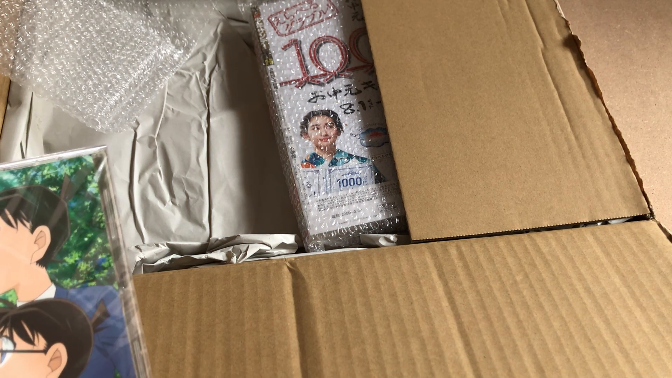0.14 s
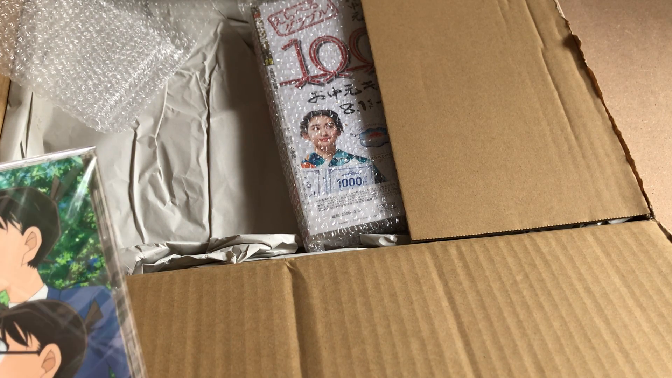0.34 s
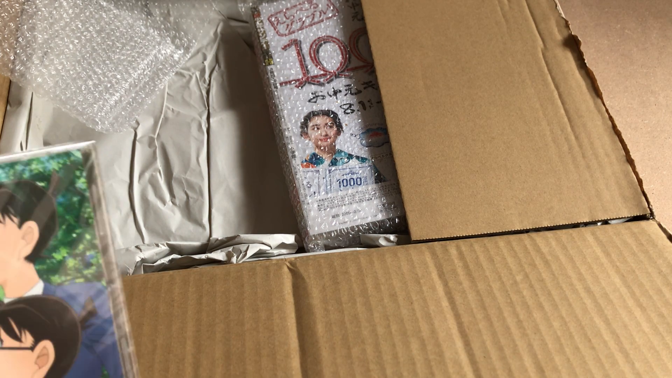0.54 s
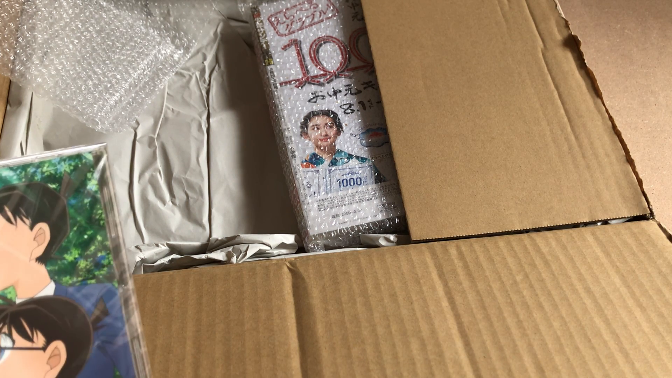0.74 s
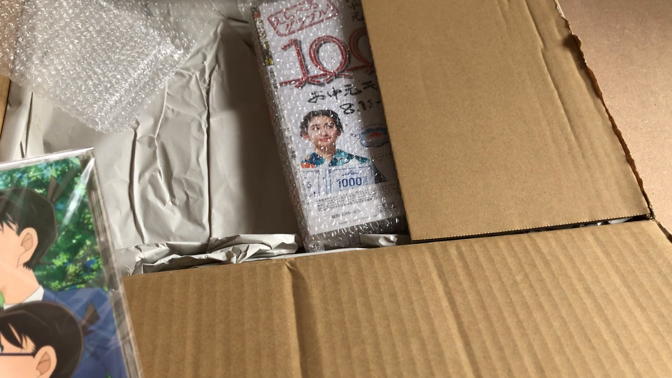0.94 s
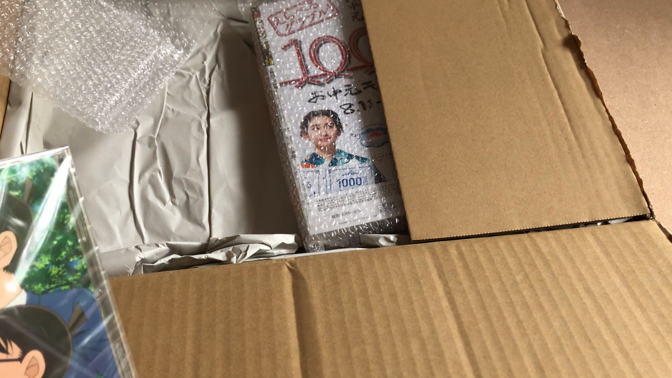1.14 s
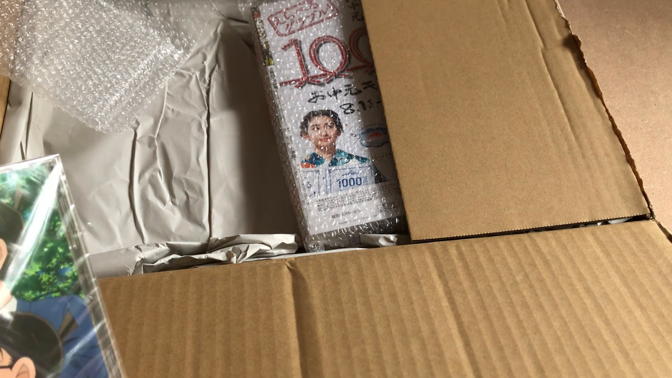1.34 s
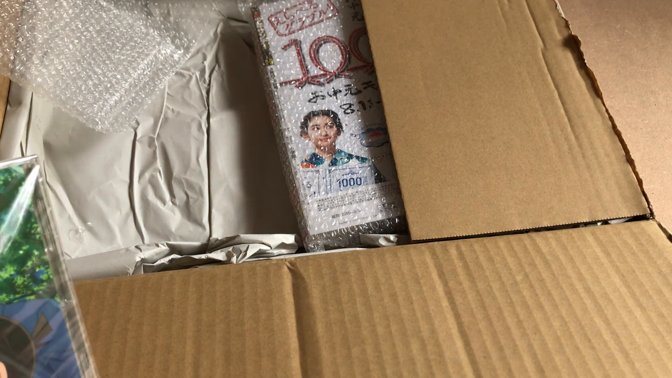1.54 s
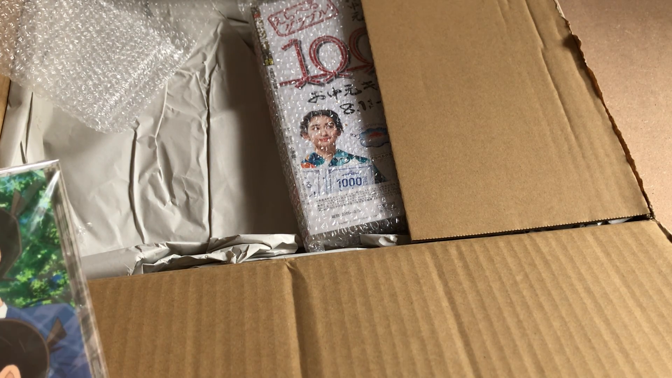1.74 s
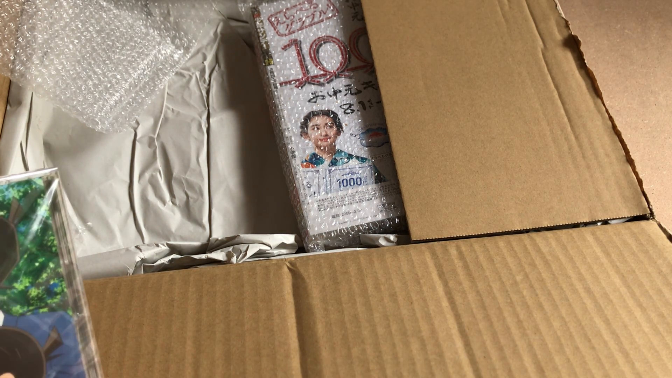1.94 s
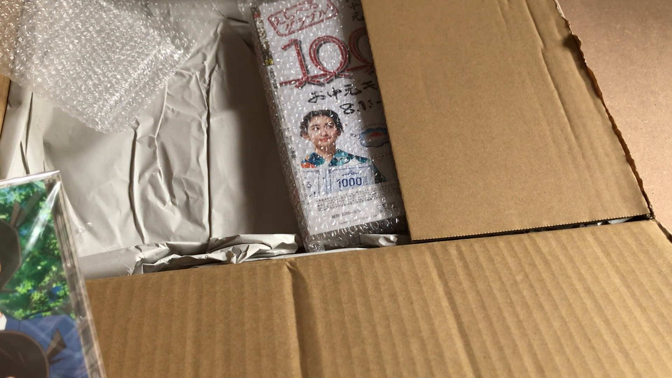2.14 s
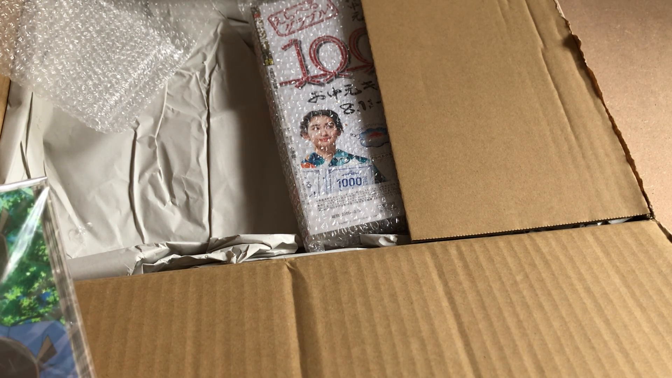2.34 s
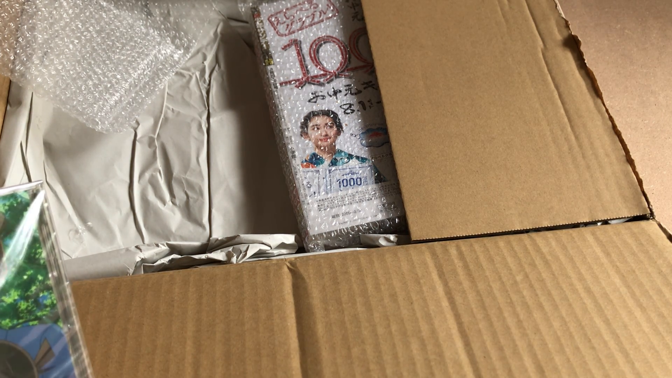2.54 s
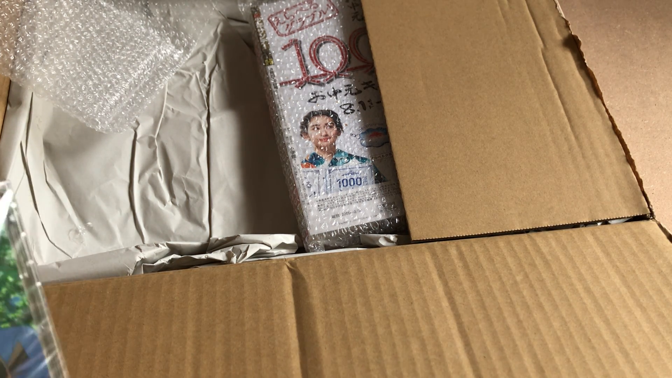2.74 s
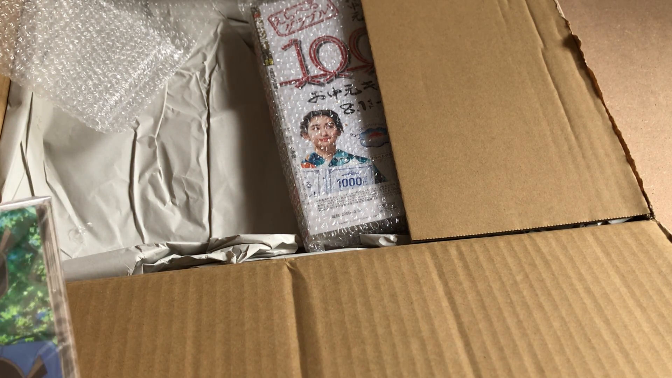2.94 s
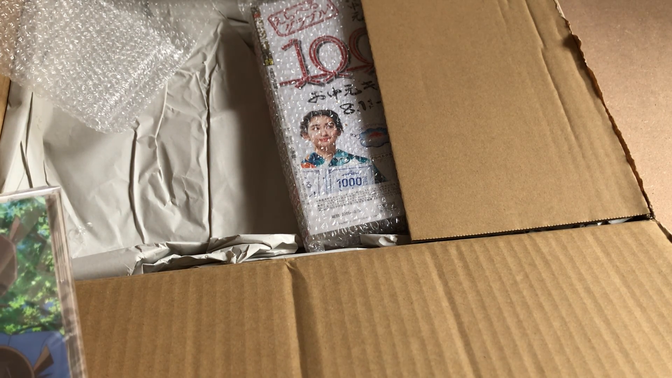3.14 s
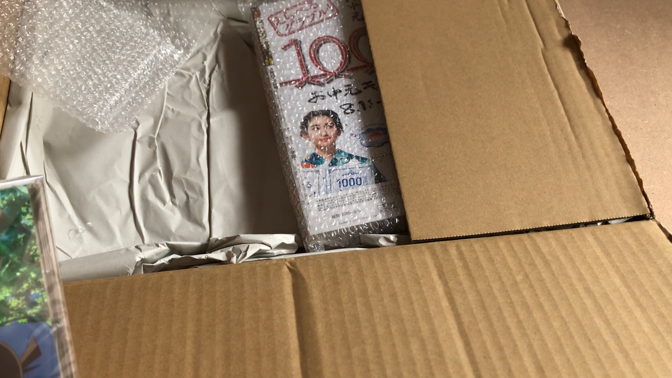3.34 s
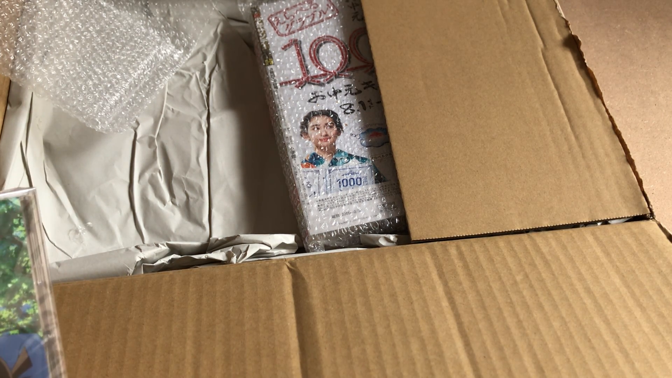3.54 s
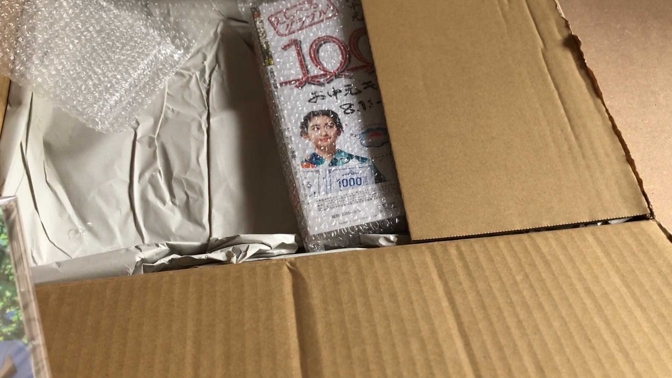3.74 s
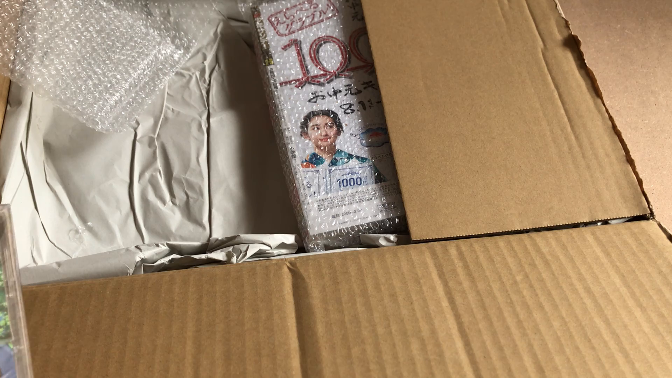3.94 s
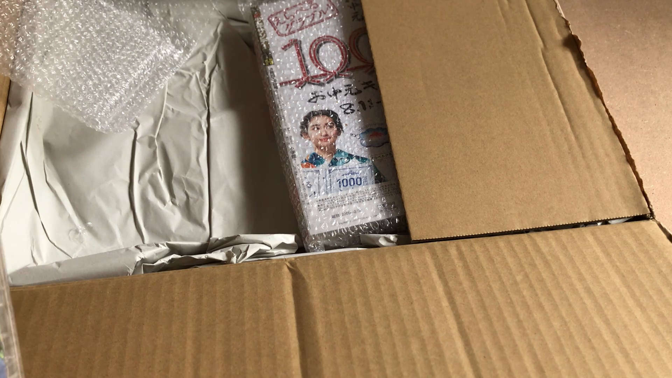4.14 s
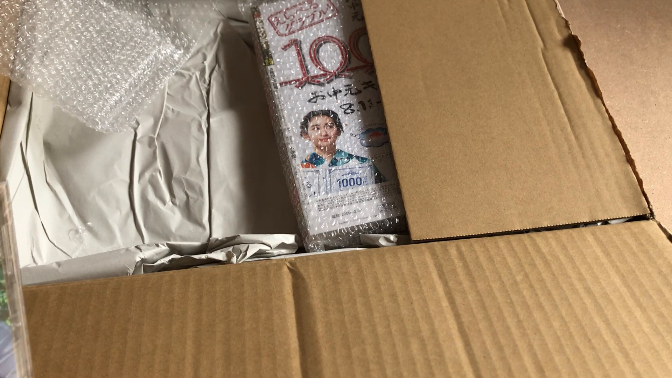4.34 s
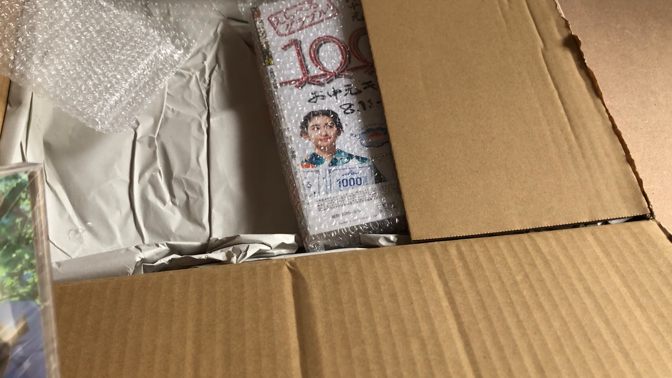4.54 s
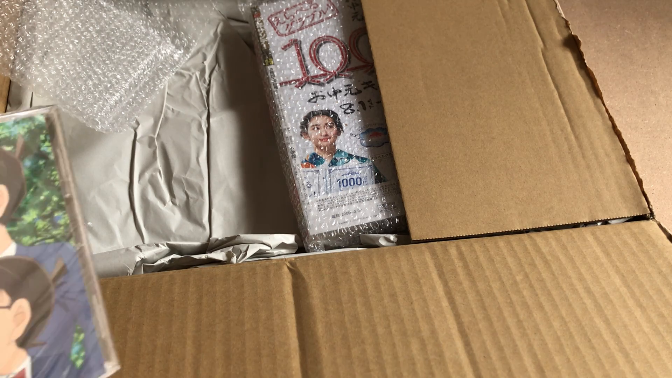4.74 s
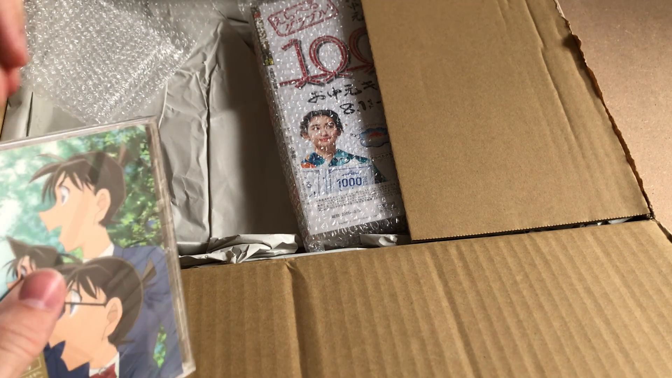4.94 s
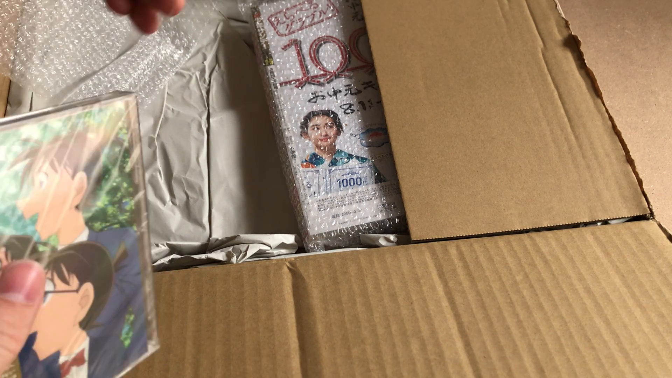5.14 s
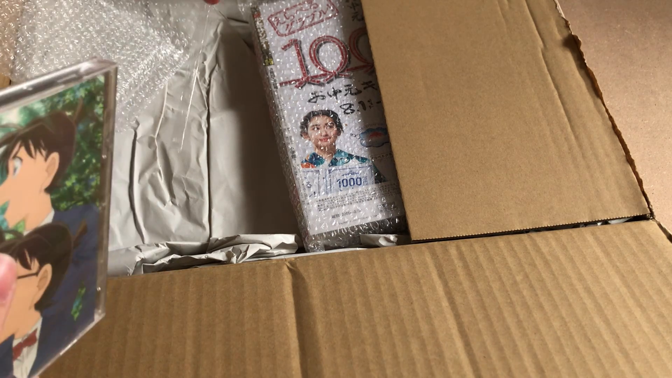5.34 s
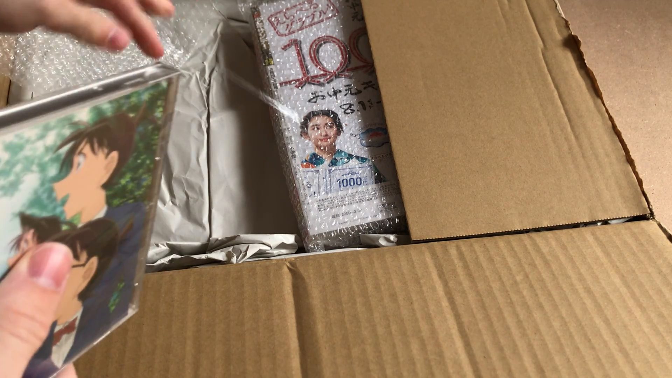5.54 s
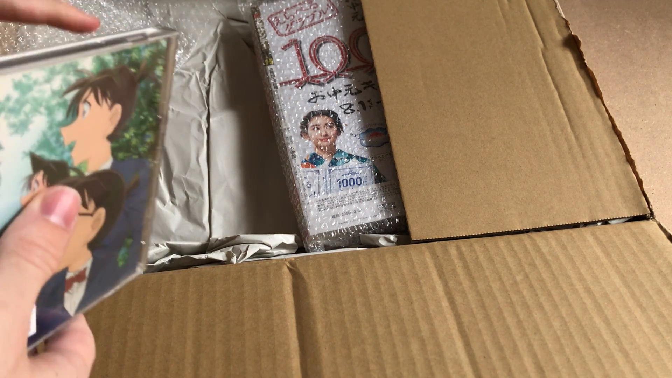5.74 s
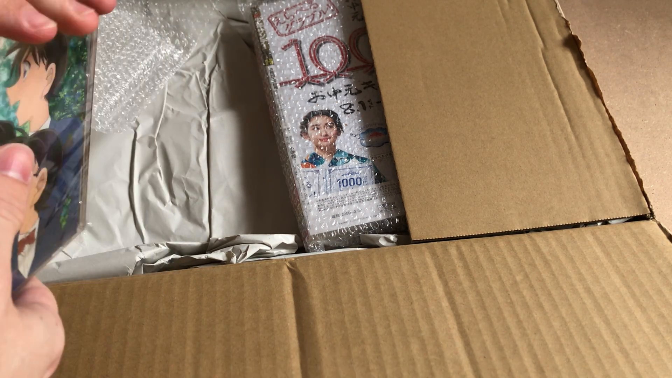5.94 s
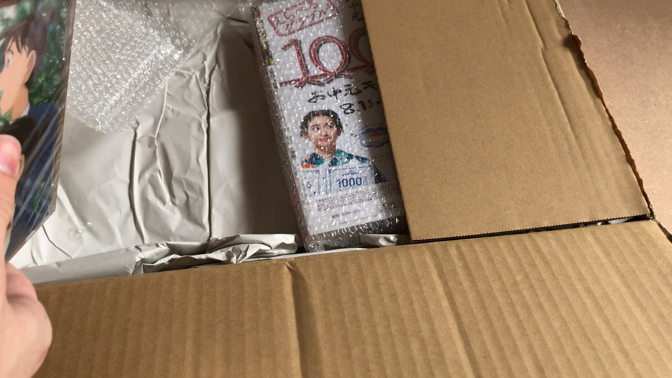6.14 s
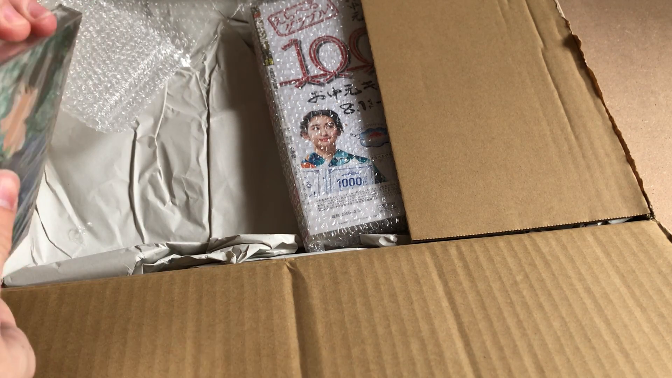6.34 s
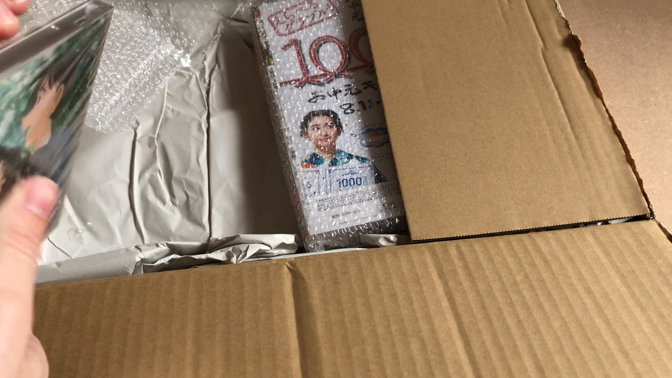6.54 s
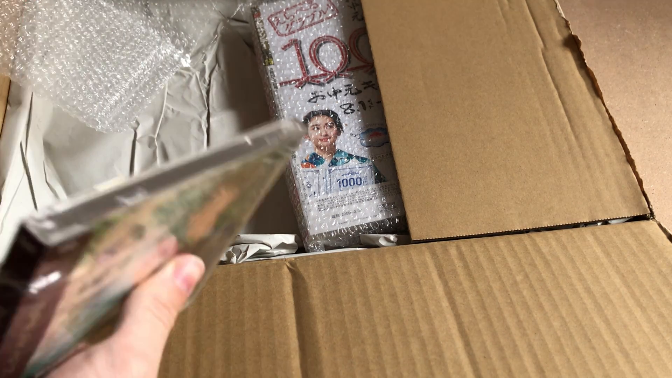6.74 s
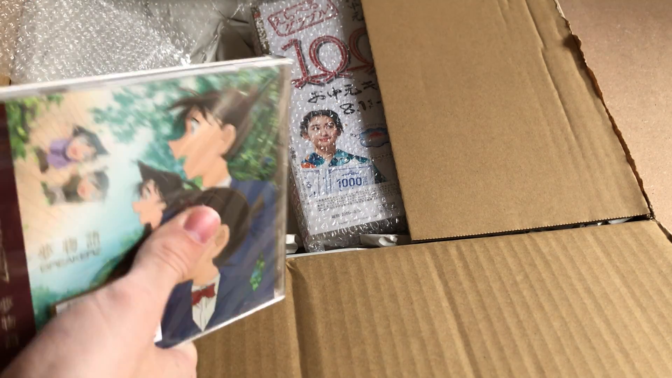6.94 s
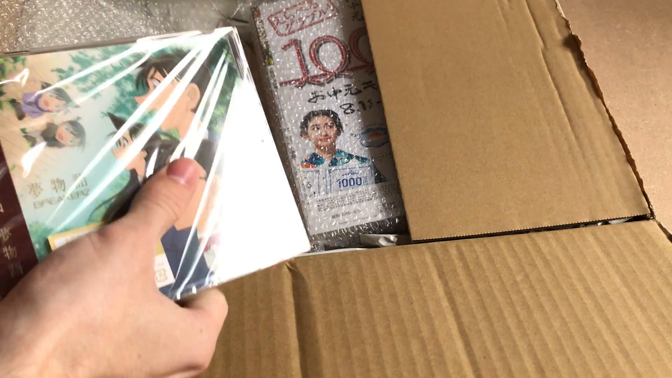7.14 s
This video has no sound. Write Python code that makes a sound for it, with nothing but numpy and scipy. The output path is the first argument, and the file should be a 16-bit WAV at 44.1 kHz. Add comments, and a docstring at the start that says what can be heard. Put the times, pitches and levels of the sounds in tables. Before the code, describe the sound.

Fingers pick at the shrink-wrap on a hard plastic disc case, close to the microphone in a small quiet room. Faint, scattered ticks come first, then a sharp snap and a run of crinkling as the film tears. After a short lull, the loudest crack comes with a dull thump, followed by dense crackling and hollow knocks as the wrap is pulled off. A faint hum and hiss lie underneath.

```python
"""Faint, sharp ticks of thin shrink-wrap being picked at, building to loud crackling as it is torn
and pulled off a hard plastic case, close by in a small quiet room. Single creases snap as they flip,
dense ones rustle, and the hollow case knocks and thumps under the fingers. Beneath it lie a low hum
and rumble, a hiss that steps up for a while after some snaps, and a faint 30-a-second treble buzz."""
import sys
import numpy as np
from scipy import signal
from scipy.fft import rfft, irfft, next_fast_len
from scipy.io import wavfile
from scipy.ndimage import uniform_filter1d, map_coordinates

SR = 44100
rng = np.random.default_rng(int(sys.argv[2]) if len(sys.argv) > 2 else 0)


def log_audio(samples):
    """Write samples as a 16-bit WAV file to the path given in sys.argv[1]."""
    # one column per channel
    frames = np.atleast_2d(samples).T
    # limit to full scale, then quantise
    limited = np.clip(frames, -1, 1)
    pcm = np.round(limited * 32767).astype(np.int16)
    wavfile.write(sys.argv[1], SR, pcm)


N = 317520  # 7.2 s

# Film spectra, low to high: (frequency [Hz], relative gain [dB])
BODY_BAND = [(400, -21.5), (850, -6), (1250, 1.5), (1900, -1.5), (2600, 1.5), (4200, -43)]  # film on the case
SHEET_BAND = [(1800, -12), (3300, 0), (6000, 3), (8800, 2), (11500, -25)]  # taut sheet
EDGE_BAND = [(7000, -23), (9300, 1.5), (12500, 6.5), (15700, 4.5), (16300, -16), (17500, -33)]  # brightest part of a snap
# Creases, small folds bright, big folds dull: (time [s], level [dB], brightness [dB/band])
CREASES = [(0.028, -51, -3), (0.046, -56, -2), (0.0731, -52, -3), (0.0837, -50.7, 0), (0.1927, -53.7, 5.9),
           (0.3034, -52.5, -13), (0.4855, -45, 7), (0.492, -44, 2.5), (0.5171, -51, -6), (0.642, -51.5, -3),
           (0.665, -39, 8.5), (1.009, -51, -1), (1.0443, -57, -9), (1.201, -51.6, 16), (1.242, -49, 7),
           (1.2606, -47.5, 11), (1.3966, -50.2, 9.5), (1.447, -46, 8), (1.5189, -43.5, 5.5),
           (1.5372, -44.5, 10.1), (1.5946, -49.5, 13), (1.8267, -45.5, 0), (1.946, -47, 3),
           (2.0012, -50.2, -2.5), (2.022, -46.5, 5.4), (2.4026, -50.5, 7), (2.4153, -49, 6),
           (2.535, -38, 15.5), (2.729, -42.5, 6), (2.742, -46.5, -2), (3.035, -51.5, 0), (3.0441, -54.1, 2),
           (3.3108, -49, -11), (3.323, -50.5, 4.0), (3.4558, -50, -6.5), (3.6868, -46.5, 7),
           (3.785, -58, 7.3), (4.015, -41, 13.5), (4.0236, -58, 5), (4.0591, -23.6, 0.8),
           (4.069, -34.1, -1), (4.079, -28.5, 12), (4.0981, -35, -5), (4.14, -36.5, 7), (4.1512, -44, 7),
           (4.349, -52, 3), (4.3666, -50, 8), (4.3767, -39, 2), (4.473, -52, -9), (4.754, -53, -3),
           (4.7813, -47.5, -0.8), (4.7975, -38, 2.6), (4.8105, -41, 6), (4.8183, -37.5, 6), (4.853, -42, 5),
           (4.8941, -34, 2), (4.8987, -30.5, 4.5), (4.9403, -32.5, 4.0), (4.954, -38, 5), (4.973, -36, 2),
           (4.9871, -37.5, -0.5), (5.008, -49, 8), (5.017, -32.2, 17), (5.0489, -39.5, 3),
           (5.0608, -31.5, 13.6), (5.0791, -26, 7.3), (5.095, -31, 9.1), (5.1104, -40.5, 1),
           (5.1167, -36, 5), (5.1335, -31, -1.2), (5.151, -34.9, 4), (5.1617, -36.1, -5),
           (5.1747, -31.5, 3.2), (5.186, -32.5, 3), (5.1973, -38, 1), (5.255, -38.5, 3), (5.2987, -39.5, 4),
           (5.3076, -34, 4), (5.322, -52, -1), (5.345, -31, 9), (5.3568, -37, 2), (5.363, -41, 10),
           (5.3716, -20.5, 2), (5.3833, -14, 7), (5.5667, -40, 17), (5.5934, -38, 13), (5.61, -34.5, 10),
           (5.6564, -43.5, 2), (5.6685, -47, 8), (5.8566, -54.5, -1), (5.8805, -46.5, 1.5),
           (5.8977, -55, 10), (5.989, -57, 2), (6.0058, -50, -1.5), (6.0868, -51, 6), (6.189, -52, 5),
           (6.202, -54, 10), (6.2262, -36.1, 15), (6.2311, -41, 9), (6.249, -46, 9), (6.3262, -52, 1),
           (6.3545, -44.5, 3), (6.3832, -43, 6.5), (6.493, -46.5, -5.5), (6.508, -47, -0.5),
           (6.5646, -47, 0.5), (6.5804, -44, 8), (6.603, -32.5, 3.5), (6.62, -36, 2), (6.6418, -33, 3),
           (6.668, -25.5, 1.9), (6.6973, -25, 2), (6.701, -25, 9), (6.7228, -13.5, 4.5), (6.7249, -14, 3),
           (6.7298, -15.5, 2), (6.735, -23, 8), (6.7408, -19, 2.8), (6.8666, -28, 5), (6.9186, -27.4, 8),
           (6.9212, -33, 15), (6.9366, -26.5, 0), (6.9604, -33, 12), (6.984, -27, 5), (7.001, -21.5, 0),
           (7.015, -32, -9), (7.038, -21.5, 0.5), (7.0496, -21.5, 1.5), (7.0616, -26.5, -10),
           (7.083, -37, 13), (7.091, -30.5, -1), (7.115, -34, 9.5), (7.1418, -25.6, 6.8),
           (7.1629, -23.5, 1.5), (7.1733, -24.5, 0), (7.1823, -20, 18)]
def snaps(creases, length):
    """A crease flips: a puff of milliseconds, scaled by length and coloured by the size of the fold."""
    time_s, level_db, bright_db = np.transpose(creases)
    body, sheet, edge = band_gains(level_db, bright_db, sheet_db=0, sheet_db_per_db=0.092)
    stretch = length * amp(4.2 * rng.standard_normal(len(time_s)))
    return (coloured(puffs(time_s, body, t60_s=0.017 * stretch), BODY_BAND)
            + coloured(puffs(time_s, sheet, t60_s=0.011 * stretch), SHEET_BAND)
            + coloured(puffs(time_s, edge, t60_s=0.0053 * stretch), EDGE_BAND))


def stray_creases(per_s=14, level_db=-65.5, bright_db=4.5):
    """Faint creases that settle at random moments; rows as in CREASES."""
    count = int(per_s * N / SR)
    scatter = rng.standard_normal((count, 2))
    time_s = rng.random(count) * N / SR
    return np.c_[time_s, level_db + 4 * scatter[:, 0], bright_db + 6 * scatter[:, 1]]


def band_gains(level_db, bright_db, sheet_db, sheet_db_per_db):
    """Body, sheet and edge share one level along a slope; hard pulls ring the taut sheet more."""
    quiet_db = -50
    middle_db = sheet_db + sheet_db_per_db * (level_db - quiet_db)
    edge_db = bright_db + 0.53 * np.minimum(bright_db, 0)  # big dull folds lose extra edge
    slope = amp([-bright_db, middle_db, edge_db])
    return amp(level_db) * slope / np.linalg.norm(slope, axis=0)


def puffs(time_s, gain, t60_s):
    """White puffs that swell to one sharp flip and die, each with the energy of 1 ms at rms gain."""
    t = np.arange(400) / SR
    swell = 1 - np.exp(-t / (0.032 * t60_s[:, None]))
    grains = rng.standard_normal((len(time_s), len(t))) * swell * amp(-60 * t / t60_s[:, None])
    grains[:, 6] = 1.8 * np.sign(grains[:, 6])  # the flip
    grains *= gain[:, None] * np.sqrt(SR / 1000) / np.linalg.norm(grains, axis=1, keepdims=True)
    at = np.round(time_s * SR).astype(int)[:, None] + np.arange(len(t))
    return np.bincount(at.ravel(), grains.ravel(), N + SR)[:N]


# Rubbing and crumpling: (start [s], hold [s], fade t60 [s], level [dB], brightness [dB/band])
STROKES = [(0.49, 0.011, 0.16, -56, 5), (1.248, 0.034, 0.16, -71.5, 12), (1.521, 0.072, 0.13, -62, 0.5),
           (2.735, 0.016, 0.088, -56.5, 8), (2.766, 0.0063, 0.05, -53, 0), (2.802, 0.024, 0.036, -57, -6),
           (4.066, .03, 0.06, -48.5, 0), (4.096, 0.0074, 0.079, -40, 4.5), (4.12, .03, .2, -64.5, 10),
           (4.375, 0.0084, 0.04, -45.5, 10.5), (4.791, 0.013, .1, -54.5, 6.5),
           (4.903, 0.0087, 0.12, -52.5, 3), (4.93, .1, .2, -67, 0), (5.05, .13, .2, -58, 1.5),
           (5.14, 0.064, .06, -63, -6), (5.223, 0.068, .12, -53.5, 1.5), (5.345, 0.049, 0.15, -37.5, 5),
           (5.56, 0.15, .2, -64.5, 5), (5.826, 0.067, .2, -68, 5), (5.989, .06, 0.47, -64.5, -0.5),
           (6.158, 0.091, .2, -68, -7), (6.218, 0.025, .12, -55, 3), (6.321, 0.069, .1, -63, -0.5),
           (6.47, 0.041, .15, -68, -3.5), (6.578, 0.086, .1, -55, 2), (6.705, 0.013, .1, -48.5, -1),
           (6.729, 0.01, 0.34, -23.5, 2.5), (6.922, 0.095, 0.16, -34, 5.5), (7.034, .06, 0.26, -40, 4.5),
           (7.114, 0.052, .1, -36, 2.5), (7.162, 0.02, .06, -31.5, 10)]
def rustle():
    """Each stroke crumples the film: dense crackle that climbs fast, holds and fades."""
    t = np.arange(N) / SR
    gains = np.zeros((3, N))
    for start_s, hold_s, fade_s, level_db, bright_db in STROKES:
        rise_s = 0.017 + 0.36 * hold_s
        rise_db = -60 * np.maximum(start_s - t, 0) / rise_s
        fade_db = -60 * np.maximum(t - start_s - hold_s, 0) / fade_s
        bands = band_gains(level_db, bright_db, sheet_db=1.5, sheet_db_per_db=0.17)
        gains += bands[:, None] * amp(rise_db + fade_db)
    fine = crackle(per_s=450, spread_db=4.0, t60_s=0.0062, rub_gain=0.5)
    coarse = crackle(per_s=350, spread_db=3.5, t60_s=0.014, rub_gain=0.77)
    body = coloured(0.33 * fine + 0.86 * coarse, BODY_BAND)
    sheet = coloured(0.85 * fine + 0.18 * coarse, SHEET_BAND)
    edge = coloured(fine, EDGE_BAND)
    return (gains * [body, sheet, edge]).sum(axis=0)


def crackle(per_s, spread_db, t60_s, rub_gain):
    """Countless tiny creases of scattered but bounded size over a smooth rub, rms 1."""
    pool = rng.random((int(N / SR * 900), 2))
    when, size = pool[np.arange(len(pool)) < per_s * N / SR].T
    size_db = -spread_db * np.log(1 - 0.97 * size)
    grains = puffs(when * N / SR, amp(size_db), np.full(len(when), t60_s))
    return unit(unit(grains) + rub_gain * rng.standard_normal(N))


# Modes of the hollow case: (frequency [Hz], gain [dB], t60 [s])
CASE_MODES = [(243, -3, 0.064), (340, 9.5, 0.029), (436, -1, 0.068), (551, -1.5, 0.049), (654, 5, 0.031),
              (1005, 5, 0.048)]
# Finger knocks: (time [s], level [dB], pitch favoured by the struck spot [Hz])
KNOCKS = [(0.074, -57, 446), (0.492, -59, 402), (1.009, -63.5, 400), (2.001, -70, 400), (2.744, -61, 553),
          (4.061, -43, 507), (4.085, -45.5, 560), (4.1, -48.5, 470), (4.375, -60, 500), (5.133, -58, 400),
          (5.381, -47, 705), (6.23, -54, 450), (6.507, -52.5, 660), (6.938, -50, 400), (6.995, -39.5, 750),
          (7.037, -33.5, 890), (7.06, -36.5, 430), (7.096, -42.5, 950), (7.162, -32.5, 520),
          (7.18, -34.5, 420)]
def case_knocks():
    """Fingers knock the case: short dull rings, favouring the modes near the spot's pitch."""
    out, t = np.zeros(N + SR), np.arange(SR // 4) / SR
    mode_hz, mode_db, t60_s = np.transpose(CASE_MODES)[:, :, None]
    attack = 1 - np.exp(-t / 0.001)
    for time_s, knock_db, spot_hz in KNOCKS:
        grip = amp(rng.normal(0, 0.35, mode_hz.shape))  # the holding hand detunes each mode
        scatter_db = rng.normal(0, 2, mode_hz.shape)
        level_db = knock_db + mode_db - 5.5 * np.log2(mode_hz / spot_hz) ** 2 + scatter_db
        rings = amp(level_db - 60 * t / t60_s) * np.sin(2 * np.pi * mode_hz * grip * t)
        out[round(time_s * SR):][:len(t)] += attack * rings.sum(axis=0)
    return out[:N]


# Jolts of the case: (time [s], level [dB], first pitch [Hz], last pitch [Hz], t60 [s])
JOLTS = [(4.064, -44, 150, 60, .12), (6.7245, -19.5, 230, 49, .1)]
def case_thumps(sag_s=0.004):
    """The jolted case gives a deep thump whose pitch sags."""
    out, t = np.zeros(N + SR), np.arange(SR // 4) / SR
    for time_s, level_db, first_hz, last_hz, t60_s in JOLTS:
        cycles = np.cumsum(last_hz + (first_hz - last_hz) * np.exp(-t / sag_s)) / SR
        out[round(time_s * SR):][:len(t)] += amp(level_db - 60 * t / t60_s) * np.sin(2 * np.pi * cycles)
    return out[:N]


# Room decay: (frequency [Hz], t60 [s])
ROOM_DECAY = [(300, 0.09), (2000, 0.43), (6000, 0.38), (14000, 0.24)]
def room(x, delay_samples=150):
    """Each frequency dies at its own rate; the hands move, so every 1/8 s gets a new tail."""
    out, step = np.zeros(N + 2 * SR), SR // 8
    for start in range(0, N, step):
        hz, t, spectrum = signal.stft(rng.standard_normal(SR // 2), SR, nperseg=256)
        decay = amp(-60 * t / along(ROOM_DECAY, hz)[:, None])
        tail = signal.istft(spectrum * decay, SR, nperseg=256)[1]
        reverb = signal.fftconvolve(x[start:start + step], tail / np.linalg.norm(tail))
        out[start + delay_samples:][:len(reverb)] += reverb
    return out[:N]


# Spans of raised hiss: (start [s], end [s])
HISS_LIFTS = [(0.48, .9), (1.949, 2.354), (4.053, 4.506), (4.79, 5.792), (6.577, 7.3)]
# Hiss spectrum: (frequency [Hz], relative density [dB])
HISS_SPECTRUM = [(60, 1), (150, 11.5), (400, 9), (800, 6), (2000, 0.5), (5000, -1.5), (10000, -5.5),
                 (13000, -5), (15600, -5), (16100, -31.5)]
def hiss(lift_db=10.5):
    """Soft hiss that steps up during the listed spans."""
    t = np.arange(N) / SR
    steps_db = lift_db * sum((t > start_s) & (t < end_s) for start_s, end_s in HISS_LIFTS)
    return amp(-75.5 + uniform_filter1d(steps_db, size=300) + 0.52 * wobble(11)) * noise(HISS_SPECTRUM)


# Rumble spectrum: (frequency [Hz], relative density [dB])
RUMBLE_SPECTRUM = [(20, -5), (50, 1), (150, -3), (400, -11.5), (1000, -39.5)]
def rumble():
    """Low noise with a lumpy level."""
    return amp(-71.5 + 0.76 * wobble(4.07) + 1.9 * wobble(25)) * noise(RUMBLE_SPECTRUM)


# Hum envelope: (time [s], level [dB])
HUM_LEVELS = [(0, -78), (.3, -59), (.62, -76), (1.9, -70.5), (3.3, -74), (4.5, -66), (5, -66.5),
              (5.65, -64), (6.3, -56), (6.65, -57), (6.85, -78), (7.2, -75)]
def hum(pitch_hz=61.5):
    """A low tone wavering in pitch and level."""
    cycles = np.cumsum(pitch_hz + 3 * wobble(22)) / SR
    level_db = np.interp(np.arange(N) / SR, *np.transpose(HUM_LEVELS)) + 1.8 * wobble(19)
    return amp(level_db) * np.sin(2 * np.pi * cycles)


# Buzz spectrum: (frequency [Hz], relative density [dB])
BUZZ_SPECTRUM = [(9500, -35.5), (10800, -10.5), (11800, 1.5), (13000, -10), (15000, -3), (16200, -27.5)]
def buzz(rate_hz=30):
    """Faint treble noise in regular pulses of flickering strength."""
    t = np.arange(N) / SR
    pulses = (0.5 + 0.5 * np.cos(2 * np.pi * rate_hz * (t - 0.0125))) ** 2.3
    return amp(-75.5 + 3.0 * wobble(34)) * pulses * noise(BUZZ_SPECTRUM)


def amp(db):
    """Gain of a level in dB."""
    return 10 ** (np.asarray(db) / 20)


def unit(x):
    """x at rms 1."""
    return x / np.sqrt(np.mean(x ** 2) + 1e-20)


def along(points, hz):
    """Interpolate (frequency [Hz], value) points on a log axis."""
    knots_hz, values = np.transpose(points)
    return np.interp(np.log(hz + 1), np.log(knots_hz + 1), values)


def wobble(knots_per_s):
    """A smooth random curve."""
    knots = rng.standard_normal(int(N * knots_per_s / SR) + 4)
    return map_coordinates(knots, [np.arange(N) * knots_per_s / SR])


def coloured(x, spectrum, size=4096):
    """x through a minimum-phase filter shaped like spectrum; white noise keeps its rms."""
    gain = amp(along(spectrum, np.fft.rfftfreq(size, 1 / SR)))
    cepstrum = irfft(np.log(gain), size)
    cepstrum[1:size // 2] *= 2
    cepstrum[size // 2 + 1:] = 0
    impulse = irfft(np.exp(rfft(cepstrum)), size)
    return signal.fftconvolve(x, impulse / np.linalg.norm(impulse))[:N]


def noise(spectrum):
    """Steady coloured noise, rms 1."""
    return unit(coloured(rng.standard_normal(N), spectrum))


def scene():
    """Film and case close by, their reverberation and the background, in mono."""
    rubs = rustle()
    case = case_knocks() + case_thumps()
    creases = np.r_[CREASES, stray_creases()]
    # the walls hear a snap from all sides at once, which evens out its colour as a shorter puff does
    to_walls = amp(-11.5) * snaps(creases, length=0.18) + amp(-10.0) * rubs + amp(-9.5) * case
    direct = snaps(creases, length=0.94) + rubs + case
    return (direct + room(to_walls) + hiss() + rumble() + hum() + buzz())[None]


def record(dry):
    """Brick-wall low-pass."""
    top_hz, size = 16900, next_fast_len(N + SR)
    passband = np.fft.rfftfreq(size, 1 / SR) < top_hz
    return irfft(rfft(dry, size) * passband, size)[:, :N]


dry = scene()
out = record(dry)
log_audio(out)
```